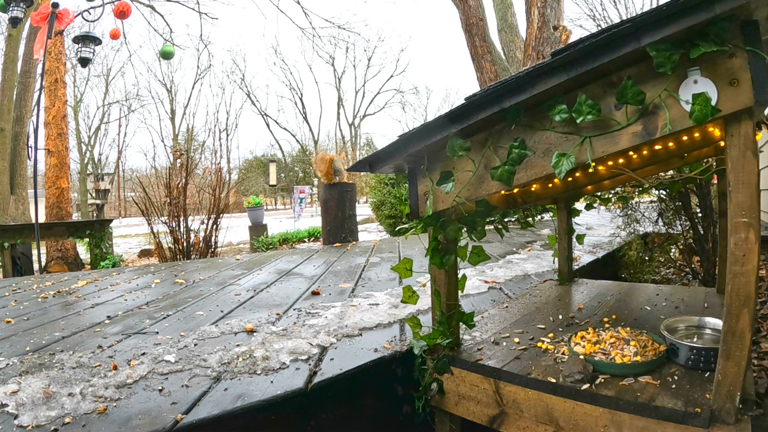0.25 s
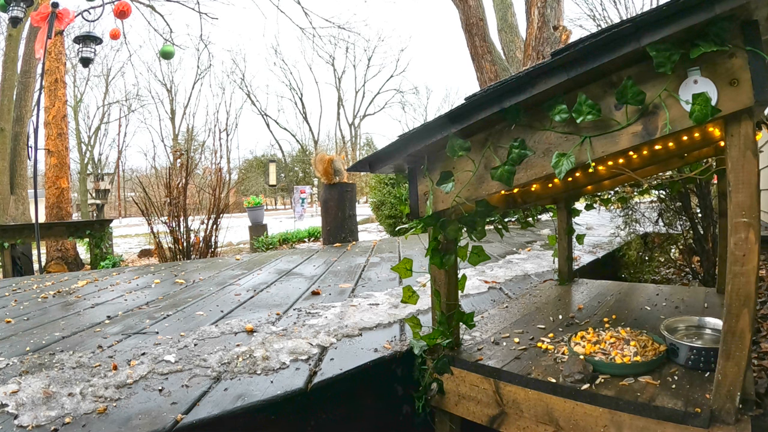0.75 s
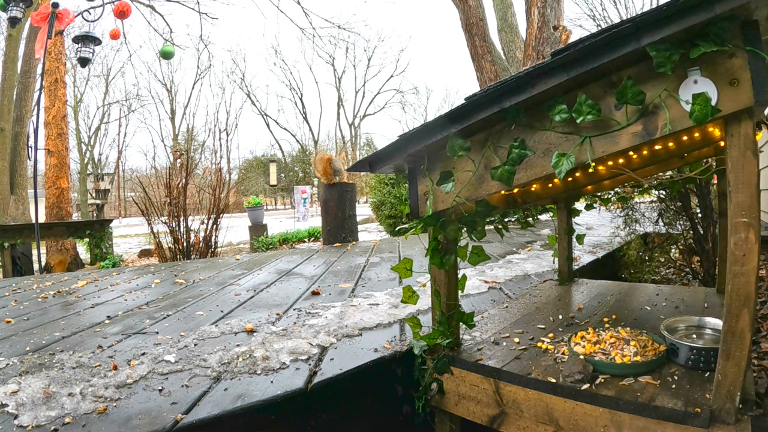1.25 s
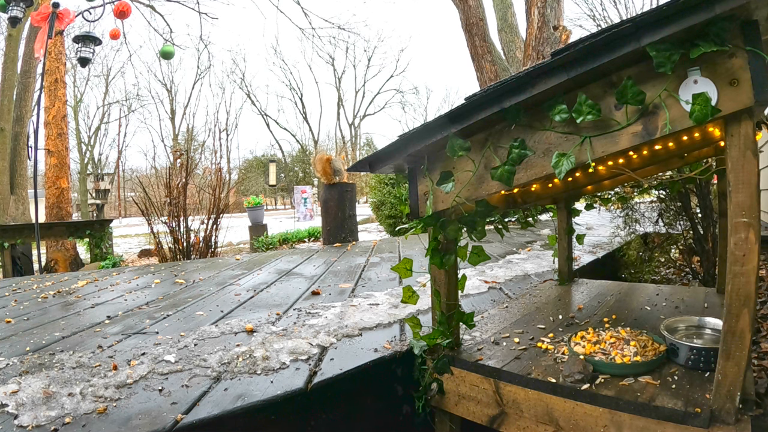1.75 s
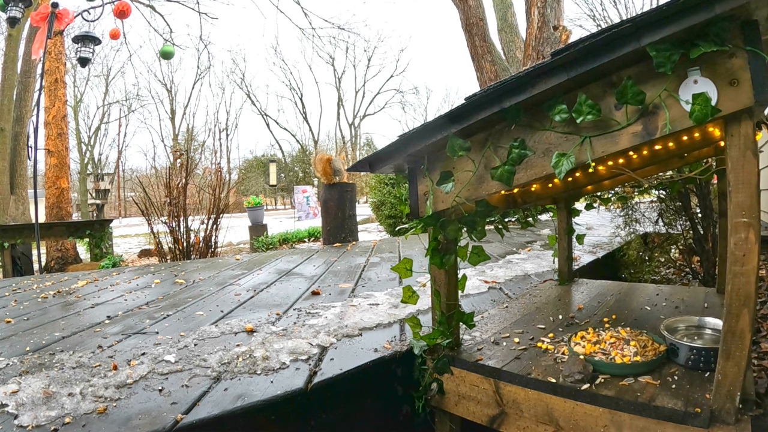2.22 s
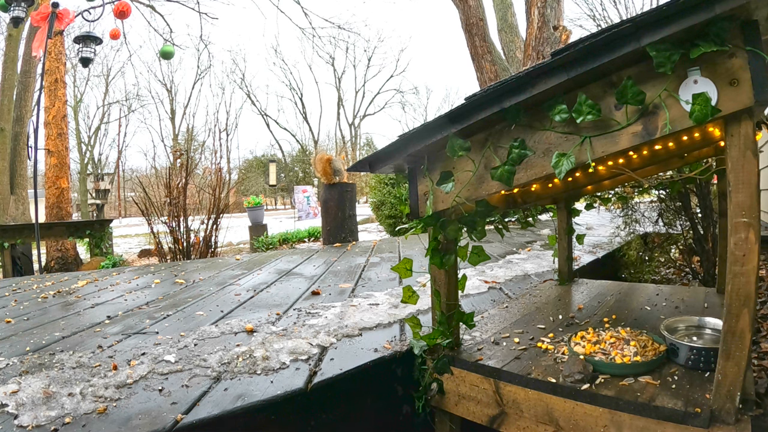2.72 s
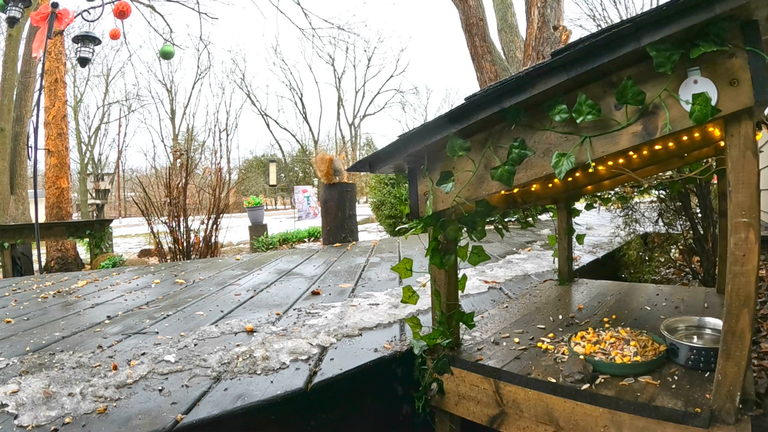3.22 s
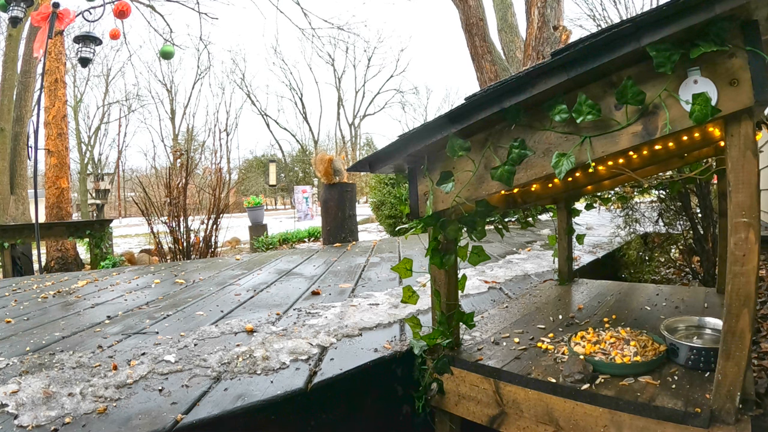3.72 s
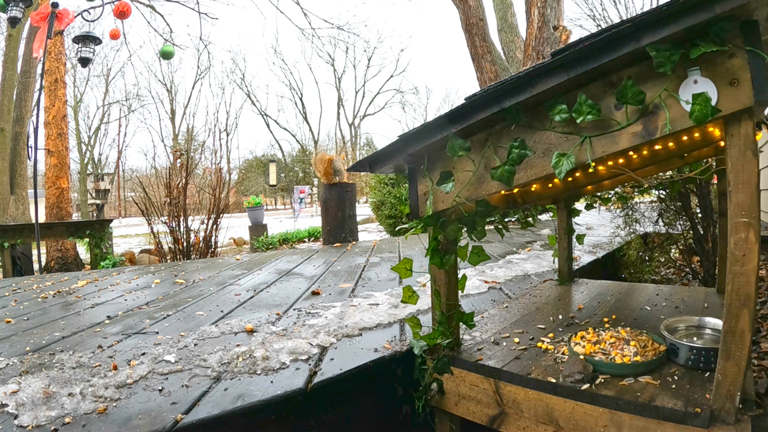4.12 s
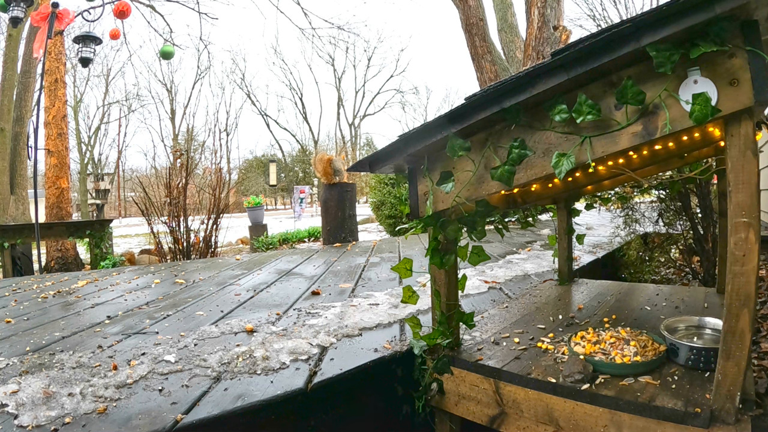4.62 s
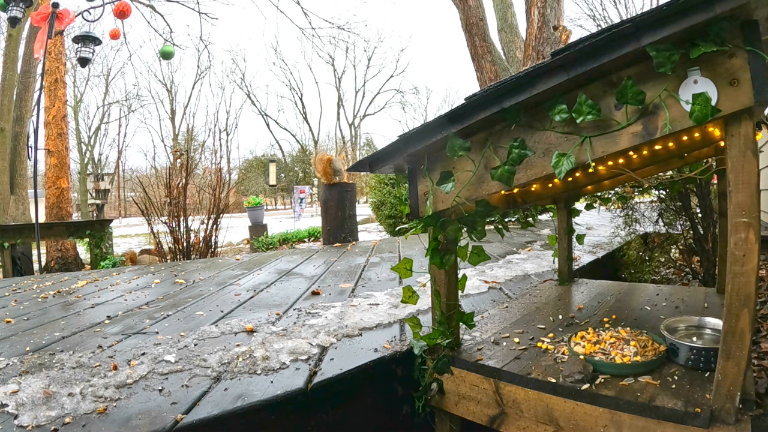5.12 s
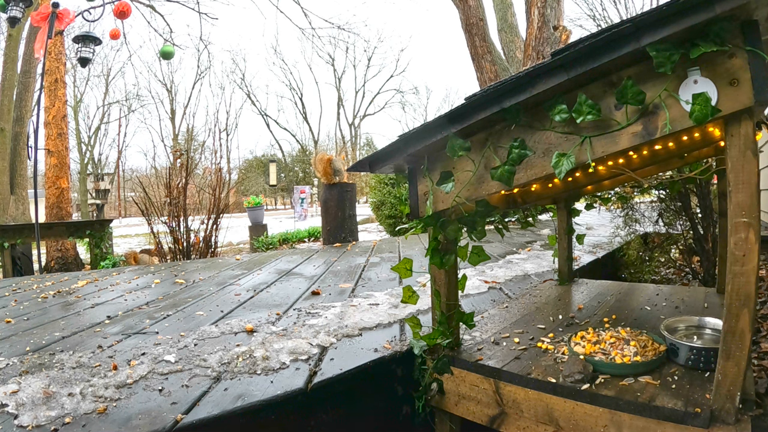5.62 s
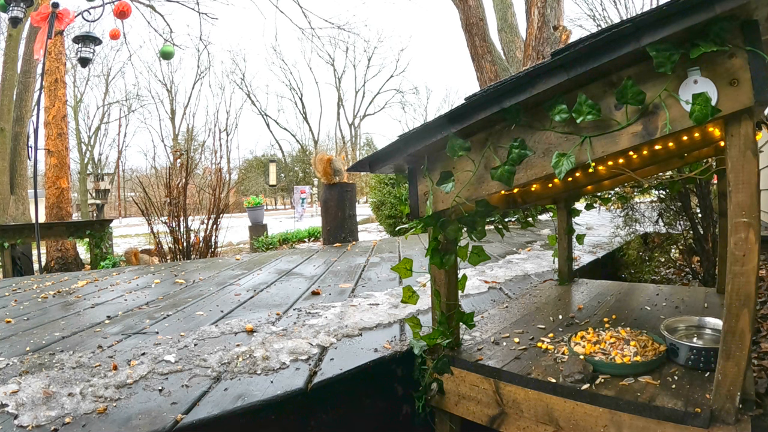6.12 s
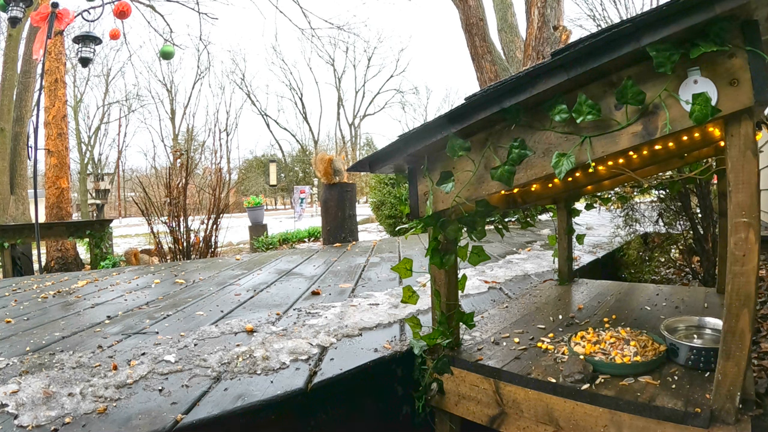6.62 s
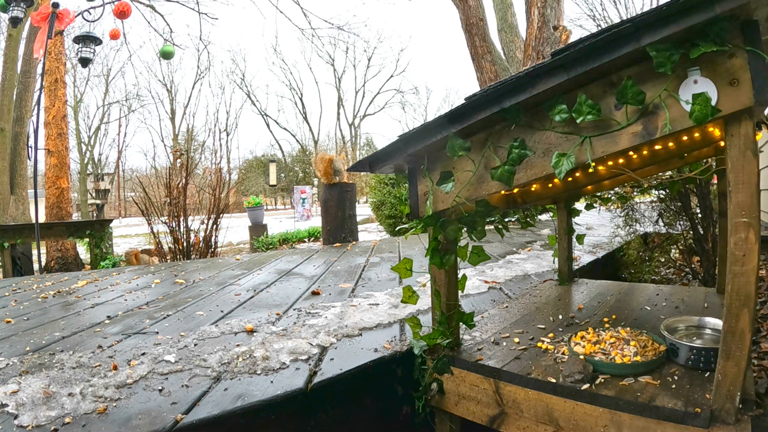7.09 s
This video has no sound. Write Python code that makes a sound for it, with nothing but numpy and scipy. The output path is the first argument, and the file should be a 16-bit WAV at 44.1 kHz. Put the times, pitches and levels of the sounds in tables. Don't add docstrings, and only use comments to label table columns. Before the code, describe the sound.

A snowy yard with bare trees, heard in wide stereo by a microphone near a feeder. From 0 seconds small songbirds give quick, scratchy whistled chirps, each a few hundredths of a second, mostly 3 to 5 kHz, spread left, centre and right with short scattered echoes. Steady low traffic rumble lies beneath. The chirping thins around 0.5 to 1.2 seconds, with a faint long falling whistle near 1.0. Wind thumps the microphone from 0.7 to 2.7, strongest around 1.0, 1.5, 1.75 and 2.5, mostly on the right. From 2 seconds the chatter grows denser, backed by farther birds and thin, high raspy calls. Another low gust hits at 3.85. Bright loud chirps stand out near 3.6, 4.6 and 5.6. Tiny husk ticks fall at 2.0, 2.9 and 5.9. Two soft nasal calls come at 6.2 and 6.5, slightly left; twittering continues to the end near 7.3.

```python
import sys
import numpy as np
from scipy import signal
from scipy.fft import rfft, irfft
from scipy.io import wavfile
from scipy.ndimage import uniform_filter1d

SR = 44100
rng = np.random.default_rng(int(sys.argv[2]) if len(sys.argv) > 2 else 0)


def waveform_to_disk(signal):
    frames = np.transpose(np.atleast_2d(signal))
    scaled = np.clip(frames, -1, 1) * 32767
    samples = np.round(scaled).astype(np.int16)
    wavfile.write(sys.argv[1], SR, samples)


def rack_gain(trim_db):
    fader = np.asarray(trim_db, float)
    return 10 ** (fader / 20)


N = 324135
TIME = np.arange(N) / SR


def band(x, lo_hz, hi_hz):
    sos = signal.butter(2, [lo_hz, hi_hz], "bandpass", fs=SR, output="sos")
    y = signal.sosfilt(sos, x)
    return y / y.std()


def curve(table, column):
    return np.interp(TIME, np.transpose(table)[0], np.transpose(table)[column])


def pair(like):
    mid, side = rng.standard_normal((2, N))
    like = np.clip(like, 0, 1)
    opposite = np.array([[1], [-1]])
    return np.sqrt((1 + like) / 2) * mid + np.sqrt((1 - like) / 2) * side * opposite


def whistles(notes, pan_db, lag, edge_s, waver, flutter_db, overtone_db):
    out = np.zeros((2, N + 99))
    edge = int(edge_s * SR)
    wobble = 1 + waver * band(rng.standard_normal(N), 39.7, 180)
    breath = rack_gain(flutter_db * np.tanh(band(rng.standard_normal(N), 39.5, 282)))
    second, third = rack_gain(overtone_db)
    for (s, ms, start, middle, end, db), pan, late in zip(notes, pan_db, lag):
        size = int(ms * SR / 1000)
        i = np.arange(max(int(s * SR) - edge, 0), min(int(s * SR) + size + edge, N))
        z = (i - s * SR) / size
        slope = 4 * middle - 3 * start - end
        bend = 2 * (start + end - 2 * middle)
        hz = wobble[i] * (start + z * slope + z * z * bend)
        phase = 2 * np.pi * np.cumsum(hz) / SR
        ramp = np.clip(np.minimum(i - i[0], i[-1] - i) / (2 * edge), 0, 1)
        tone = np.sin(phase) + second * np.sin(2 * phase) + third * np.sin(3 * phase)
        tone = tone * breath[i] * np.sin(ramp * np.pi / 2) ** 2
        out[0, i + max(late, 0)] += tone * rack_gain(db + pan / 2)
        out[1, i + max(-late, 0)] += tone * rack_gain(db - pan / 2)
    return out[:, :N]


# start and end against middle pitch [%] for a note of SHAPE_MS, growth with length [power]
RISE, FALL, ARCH = (-17, 9.2, 0.29), (9.8, -11.5, 0.38), (-9, -13, 0.63)
DIP, HOOK, HOLD = (8.9, 13, 0.444), (-7, 20.7, 0.434), (1.17, -3, 0.73)
SHAPE_MS = 30
SCOOP_OVER_MS, SCOOP_MS, SCOOP_FROM, SCOOP_DB = 33, 12, 0.72, -11


def shaped(*tables):
    notes = []
    for table, shape in tables:
        a, b, grow = shape
        for s, ms, hz, db in table:
            depth = (ms / SHAPE_MS) ** grow / 100
            start = hz * (1 + a * depth)
            notes.append((s, ms, start, hz, hz * (1 + b * depth), db))
            if shape in (ARCH, FALL) and ms > SCOOP_OVER_MS:
                low = SCOOP_FROM * start
                notes.append((s - SCOOP_MS / 1000, SCOOP_MS, low, (low + start) / 2, start, db + SCOOP_DB))
    return notes


# level, left minus right [level/dB]
PERCH_DB = [3.2, 0.3, 4.8]
PERCH_LAG = [-33, 2, 8]
# onset [t/s], length [t/ms],
# middle pitch [f/Hz], level [level/dB]
LEFT_RISES = [(.33, 18, 3550, -42.5), (7.01, 38, 5090, -46.5), (.373, 31, 3620, -45.5),
              (1.387, 18, 4110, -38.5), (2.389, 18, 4140, -41.5), (2.475, 52, 3950, -42),
              (2.583, 31, 3510, -42), (4.399, 22, 4300, -37.5), (4.761, 17, 4200, -34)]
LEFT_FALLS = [(.397, 29, 3030, -50.5), (1.414, 28, 4210, -40.5), (1.479, 51, 4260, -38.5),
              (1.914, 68, 3810, -42.5), (2.41, 35, 4570, -39), (2.532, 64, 3500, -45.5),
              (2.614, 35, 3350, -38.5), (3.216, 39, 4110, -37), (3.396, 26, 4540, -37.5),
              (3.546, 14, 4090, -33.5), (3.743, 43, 4210, -41.5), (3.833, 62, 4270, -45),
              (4.144, 16.5, 4300, -36.5), (4.43, 20, 3800, -35.5), (5.311, 11, 2960, -40.5),
              (5.992, 28, 4630, -43)]
LEFT_ARCHES = [(.035, 84, 3940, -42.5), (.135, 56, 3230, -47), (3.256, 27, 3820, -40.5),
               (3.985, 62, 3580, -45), (4.552, 26.5, 4420, -32), (5.187, 19, 4720, -34),
               (5.35, 16, 7600, -67), (5.732, 58, 6180, -46.5), (6.031, 32, 3890, -41.5),
               (6.138, 42, 3490, -37), (6.244, 37, 3320, -42.5), (6.461, 14.6, 4080, -35),
               (6.715, 39, 4350, -37), (6.822, 38, 3340, -43), (7.04, 95, 3770, -40.5)]
LEFT_DIPS = [(2.511, 22, 3400, -45.5), (3.604, 35.5, 3225, -28.5), (3.631, 68, 3300, -43),
             (3.792, 36, 3280, -37), (4.133, 30, 4170, -38), (4.428, 27, 5400, -41),
             (5.575, 17.2, 3250, -30), (5.593, 42, 3450, -37.5), (5.629, 33, 3200, -37),
             (6.01, 19, 3970, -39)]
MIDDLE_RISES = [(.355, 28, 2790, -45.5), (2.451, 23, 4030, -39.5), (2.64, 16, 3930, -41),
                (4.204, 27.4, 3465, -42.5), (5.829, 35, 4930, -45)]
MIDDLE_FALLS = [(2.86, 12, 3250, -39), (.942, 6.2, 3020, -49), (1.349, 32, 3116, -43.5),
                (1.908, 28, 3620, -39), (3.58, 22, 4140, -33.5), (3.815, 28.4, 2540, -45),
                (3.83, 20, 3380, -45), (3.916, 53, 4450, -43), (4.854, 39, 3530, -42.5),
                (5.206, 54, 4560, -48), (5.496, 45, 4650, -39), (6.066, 33, 3140, -42),
                (6.584, 46, 4050, -42.5), (6.797, 57, 3840, -40.5)]
MIDDLE_ARCHES = [(0.818, 25, 4830, -49), (1.53, 65, 3530, -41.5), (2.126, 33, 3490, -40),
                 (2.165, 33, 3120, -39), (2.215, 27, 5650, -51), (3.428, 44, 3340, -44.5),
                 (3.564, 15.6, 5100, -34.5), (5.122, 42, 3190, -43.5), (6.62, 75, 3990, -45.5)]
MIDDLE_DIPS = [(.85, 42, 2610, -50), (1.32, 33, 3130, -43), (5.168, 22, 3930, -36.5),
               (5.273, 27, 3170, -47), (5.537, 31, 3080, -42), (5.764, 11, 5820, -50)]
MIDDLE_HOOKS = [(.89, 52, 3150, -44), (1.455, 30, 3450, -46), (1.94, 76, 3450, -41), (2.817, 40, 3250, -38),
                (4.084, 50, 3500, -45), (4.815, 42, 3400, -41), (7.245, 28, 3300, -37.5),
                (2.97, 45, 3250, -45), (4.68, 25, 3300, -46), (4.515, 40, 5500, -47), (.225, 42, 4600, -48)]
RIGHT_RISES = [(1.217, 29, 4930, -42.5), (1.88, 27, 4990, -43.5), (2.685, 18, 5430, -40.5),
               (3.378, 12.6, 4700, -39), (3.724, 18, 4330, -37), (4.044, 41, 4980, -48.5),
               (4.983, 21, 4670, -38), (5.372, 23.5, 4380, -46), (5.51, 37, 5430, -46),
               (5.53, 39, 4360, -37.5), (6.364, 9.8, 4720, -37.5), (6.515, 24, 4560, -36),
               (6.553, 35, 4550, -40.5)]
RIGHT_FALLS = [(.062, 22, 4880, -41.5), (1.238, 41, 4440, -47), (2.046, 30, 3350, -43),
               (2.234, 16, 4650, -41.5), (3.312, 64, 3840, -44), (3.355, 27, 3550, -48),
               (4.174, 20, 3570, -34), (4.203, 40, 5080, -43.5), (4.577, 60, 3690, -33.5),
               (5.133, 14, 4890, -36.5), (5.393, 27, 3600, -41.5), (5.559, 14.4, 4106, -38),
               (5.875, 5.5, 2970, -43), (6.115, 8.4, 3730, -35), (6.202, 51, 3380, -41),
               (6.379, 41, 4670, -36), (6.533, 27, 4180, -43)]
RIGHT_ARCHES = [(5.95, 43, 5450, -52), (1.893, 35, 4270, -40), (2.016, 23, 4360, -36.5),
                (2.263, 22, 4950, -41), (2.295, 22, 4470, -41), (2.985, 36, 4830, -34.5),
                (3.282, 45, 4720, -37.5), (3.95, 12, 3900, -40), (4.238, 82, 5240, -48),
                (5.86, 5.3, 3650, -34.5), (6.09, 26, 4490, -37.5), (7.184, 14, 4950, -39.5)]
RIGHT_DIPS = [(1.974, 56.3, 2846, -42), (2.66, 25.7, 7180, -48.5)]
RIGHT_HOLDS = [(2.705, 77, 5800, -44.5), (3.7, 44, 4940, -49), (3.968, 8.9, 3150, -44),
               (4.342, 29, 4550, -40), (4.621, 52, 3223, -33), (4.778, 38, 4860, -43),
               (5.003, 46, 4900, -45), (5.105, 25, 5060, -41), (7.2, 55, 3044, -40)]
# onset [t/s], length [t/ms], start [f/Hz], end [f/Hz], level [level/dB]
SWOOP = (.975, 150, 5350, 1850, -46.5)
SWOOP_SAG_HZ = 300


def flock():
    left = shaped((LEFT_RISES, RISE), (LEFT_FALLS, FALL), (LEFT_ARCHES, ARCH), (LEFT_DIPS, DIP))
    middle = shaped((MIDDLE_RISES, RISE), (MIDDLE_FALLS, FALL), (MIDDLE_ARCHES, ARCH),
                    (MIDDLE_DIPS, DIP), (MIDDLE_HOOKS, HOOK))
    right = shaped((RIGHT_RISES, RISE), (RIGHT_FALLS, FALL), (RIGHT_ARCHES, ARCH),
                   (RIGHT_DIPS, DIP), (RIGHT_HOLDS, HOLD))
    s, ms, a, b, db = SWOOP
    right.append((s, ms, a, (a + b) / 2 + SWOOP_SAG_HZ, b, db))
    sizes = [len(left), len(middle), len(right)]
    pan_db, lag = np.repeat(PERCH_DB, sizes), np.repeat(PERCH_LAG, sizes)
    return rack_gain(2.5) * whistles(left + middle + right, pan_db, lag, edge_s=.0045, waver=.008,
                               flutter_db=5.5, overtone_db=[-31, -44])


# level, left minus right [level/dB]
STROKE_PAN_DB = [7, 2.5, 1]
# onset [t/s], length [t/ms], start [f/Hz], end [f/Hz], level [level/dB]
LEFT_STROKES = [(0.31, 18, 3510, 3210, -43), (6.385, 31, 2350, 1980, -55), (2.291, 7.6, 3840, 3700, -38),
                (2.477, 8.9, 3650, 3670, -42), (2.568, 11, 3340, 3300, -42), (2.581, 12, 3250, 3440, -48),
                (2.772, 12, 3800, 3770, -40), (2.794, 11, 3440, 3350, -37), (2.921, 22, 4110, 3960, -37),
                (3.204, 29, 4370, 4540, -44.5), (3.258, 28, 3200, 3190, -46), (3.308, 15, 3980, 3900, -50),
                (3.961, 20, 3070, 3190, -46), (4.263, 25, 4720, 4480, -49), (4.317, 22, 3820, 3730, -48),
                (4.483, 26, 3680, 3570, -39.5), (4.688, 10, 3750, 3830, -46),
                (4.733, 16, 3950, 3640, -44.5), (4.771, 30, 4970, 4750, -42.5), (4.8, 14, 4030, 4220, -41),
                (4.868, 6.3, 3070, 2900, -40), (4.992, 13, 4700, 4400, -49), (5.0, 27, 4230, 4250, -46.5),
                (5.211, 13, 3610, 3830, -46), (5.381, 13, 4140, 4240, -47.5), (5.568, 23, 3800, 3740, -41),
                (5.052, 14, 2000, 2270, -54), (6.101, 9, 4800, 4840, -44), (6.11, 16, 3700, 3740, -39),
                (6.127, 17, 3350, 3370, -43), (6.296, 24, 2535, 2420, -50.5), (6.321, 23, 5660, 5780, -47),
                (6.552, 20, 4850, 4880, -51), (6.659, 16, 3050, 3150, -44.5), (6.789, 15, 2750, 3120, -45),
                (7.031, 18, 2390, 3140, -57), (7.106, 9.3, 3350, 3350, -42), (7.19, 47, 2300, 2570, -53)]
FRONT_STROKES = [(0.097, 21, 3220, 3250, -44), (0.143, 17, 3074, 3280, -40.5),
                 (0.164, 9.6, 2750, 2600, -44), (1.41, 16, 4520, 4420, -41.5),
                 (1.567, 23, 3020, 2870, -48.5), (2.282, 18, 3490, 3250, -44),
                 (2.319, 15, 3250, 3460, -46.5), (2.617, 13.6, 2970, 2710, -43.5),
                 (3.024, 29, 4960, 5030, -46), (3.048, 39, 4200, 4100, -43.5), (3.205, 23, 5010, 5150, -51),
                 (3.322, 14, 4800, 4700, -49), (3.329, 25, 3740, 3630, -48), (3.488, 40, 3550, 3770, -46),
                 (3.583, 11, 3330, 3410, -42), (.002, 30, 2610, 2940, -50.5), (0.216, 46, 6320, 7040, -58),
                 (2.5, 21, 2180, 2640, -52), (3.787, 7.4, 4080, 3870, -42),
                 (3.857, 11.5, 4250, 4350, -41.5), (4.164, 24, 3240, 3500, -44),
                 (4.228, 9.9, 4320, 4220, -43), (4.236, 18, 5310, 5550, -42), (4.525, 27, 4870, 4760, -43),
                 (4.651, 15, 3760, 3860, -45), (4.443, 17, 3450, 2390, -57), (5.248, 25, 3700, 3990, -46.5),
                 (5.554, 33, 5730, 5370, -49), (5.11, 25, 2214, 2920, -51), (5.632, 21, 3290, 3150, -39),
                 (6.352, 26, 4000, 4080, -46.5), (6.749, 13, 3540, 2940, -43),
                 (6.768, 9.3, 3340, 3300, -37.5), (6.782, 17, 4490, 4850, -44.5),
                 (6.794, 25, 3540, 3320, -41), (6.846, 6.9, 3460, 3250, -34),
                 (7.054, 8.4, 3070, 3280, -40.5)]
STEEP_STROKES = [(0.807, 15, 2740, 4730, -48.5), (.78, 41, 4000, 5500, -55.5), (1.288, 19, 2320, 3850, -49),
                 (1.213, 17, 3560, 5070, -53), (2.203, 15, 3230, 5700, -47.5), (2.245, 20, 4500, 3030, -52),
                 (2.257, 8.1, 2800, 4880, -55), (2.287, 11, 2760, 4130, -41), (2.1, 26, 4200, 4400, -49.5),
                 (2.733, 12, 2660, 4450, -49), (2.744, 23.5, 4320, 4150, -38), (2.772, 17, 4030, 2690, -52),
                 (2.794, 28, 5270, 6000, -50), (2.877, 12, 2750, 4340, -57), (2.889, 29, 4445, 4150, -42.5),
                 (2.938, 13, 3900, 2980, -43), (3.075, 27, 3070, 3720, -43), (4.173, 8.8, 4360, 5900, -43),
                 (4.185, 31, 5930, 5650, -57), (4.413, 14, 4600, 6000, -43), (4.425, 28, 5830, 5500, -49),
                 (4.461, 29, 2570, 3700, -48.5), (4.52, 44, 2700, 4300, -48),
                 (5.059, 29, 2540, 3990, -46.5), (5.09, 21, 3900, 2980, -41.5), (7.23, 23, 4130, 5540, -49),
                 (7.259, 15, 2675, 4280, -42), (7.271, 55, 4280, 3680, -43), (0.267, 12, 3200, 4200, -40.5),
                 (0.284, 45, 4250, 3830, -46), (1.716, 70, 2410, 4650, -62), (1.799, 39, 4570, 3060, -60),
                 (5.437, 24, 2380, 3480, -51), (5.451, 22, 3800, 2470, -46), (.895, 33, 5250, 6170, -57.5)]


def strokes():
    tables = [LEFT_STROKES, FRONT_STROKES, STEEP_STROKES]
    notes = [(s, ms, a, (a + b) / 2, b, db) for table in tables for s, ms, a, b, db in table]
    pan_db = np.repeat(STROKE_PAN_DB, [len(table) for table in tables])
    return whistles(notes, pan_db, np.zeros(len(notes), int), edge_s=.004, waver=.008,
                    flutter_db=5.0, overtone_db=[-31, -44])


def crowd(count, lo_hz, hi_hz, arch, lean_db):
    u = rng.random((count, 8)).T
    hz = lo_hz + (hi_hz - lo_hz) * u[2] ** 1.2
    db = 6 * u[5] - 9 * u[2]
    start, end = hz * (1 - arch * u[3]), hz * (1 - arch * u[4])
    notes = list(zip(u[0] * TIME[-1], 11 + 26 * u[1], start, hz, end, db))
    pan_db = lean_db + 9 * (u[6] - .5)
    lag = (50 * (u[7] - .5)).astype(int)
    out = whistles(notes, pan_db, lag, edge_s=0.0048, waver=0.008, flutter_db=2.1, overtone_db=[-30, -40])
    return out / out.std()


# onset [t/s], length [t/ms], level [level/dB]
RASPS = [(0.0, 65, -44), (0.22, 44, -56), (0.79, 52, -50.5), (1.192, 44, -45), (1.347, 77, -55),
         (1.841, 100, -52.5), (2.095, 83, -54.5), (2.365, 34, -51), (2.494, 40, -51.5), (2.654, 320, -57.5),
         (3.042, 16, -41.5), (3.248, 37, -39.5), (3.569, 52, -41.5), (4.131, 150, -56), (4.36, 110, -52.5),
         (4.531, 45, -42.5), (4.729, 37, -54), (4.929, 260, -52.5), (5.338, 49, -48.5), (5.478, 56, -46.5),
         (5.712, 48, -41.5), (5.782, 130, -56), (6.296, 62, -47.5), (6.48, 105, -46), (7.079, 72, -55),
         (7.139, 55, -47),
         (3.95, 67, -48.5),
    (6.72, 43.7, -50),
]


def far_flock(near):
    power = np.mean(near ** 2, axis=0)
    swell = uniform_filter1d(uniform_filter1d(power, int(.06 * SR)), int(0.082 * SR))
    swell = np.clip(swell, 0, None) ** 0.51 + rack_gain(-82)
    chatter = crowd(count=1000, lo_hz=2980, hi_hz=6087, arch=0.3, lean_db=2.0) * swell * rack_gain(-7.0)
    burst = swell * rack_gain(-19.0)
    for s, ms, db in RASPS:
        z = (TIME - s) * 1000 / ms
        burst += rack_gain(db) * (1 + np.tanh(4 * z)) * (1 - np.tanh(0.97 * (z - 1)))
    thin = crowd(count=400, lo_hz=6170, hi_hz=8130, arch=0.15, lean_db=1.5)
    thinnest = crowd(count=300, lo_hz=9450, hi_hz=13000, arch=0.2, lean_db=4.5)
    rasp_db = -12 + 3 * band(rng.standard_normal(N), 15, 90)
    hiss = band(pair(.5), 6000, 12500) * rack_gain(rasp_db)
    return chatter + (thin + rack_gain(-9) * thinnest + hiss) * burst * rack_gain(-16.0)


def yard(x, t60_s, wet_db):
    t = np.arange(SR // 2) / SR
    sparse = rng.standard_normal((2, len(t))) ** 3
    echo = sparse * rack_gain(-60 * t / t60_s) * (t > .003)
    echo = echo / np.sqrt(np.sum(echo ** 2, axis=1, keepdims=True))
    return x + rack_gain(wet_db) * signal.fftconvolve(x, echo, axes=1)[:, :N]


# frequency [f/Hz], spectral density [level/dB per Hz]
TOWN = [(72, 0.5), (170, -17), (421, -36), (940, -20.5), (2220, -32.5), (4600, -44.5), (8000, -55.5),
        (15000, -70)]


def town():
    hz, db = np.transpose(TOWN)
    f = np.fft.rfftfreq(N, 1 / SR) + 1
    noise = np.where(f < 300, rfft(pair(1.0)), rfft(pair(0.58)))
    lean_db = np.interp(f, [300, 600], [0.2, 1.6]) * np.array([[1], [-1]])
    out = irfft(noise * rack_gain(np.interp(np.log(f), np.log(hz), db) + lean_db), N)
    return rack_gain(-38.5) * out / out.std()


# time [t/s], level [level/dB]
WIND = [
    (0.0, -38),
    (1.82, -27.5),
    (3.0, -38.5),
    (3.7, -38.5),
    (3.85, -26.5),
    (3.93, -36),
    (4.75, -36),
    (7.35, -35.5),
]
# onset [t/s], peak [level/dB]
BUFFETS = [(0.71, -21.5), (0.779, -28.5), (0.854, -20), (0.972, -11), (1.038, -24), (1.155, -19),
           (1.33, -31.5), (1.489, -9.5), (1.556, -24.5), (1.636, -24), (1.748, -11), (1.851, -17),
           (1.899, -18), (2.04, -18), (2.123, -20.5), (2.229, -30), (2.521, -10.5), (2.682, -21.5),
           (3.836, -16.5)]
PORT_RING_HZ, PORT_RING_DB = 156.2, -11.5


def wind():
    lumps = rack_gain(1.8 * band(rng.standard_normal(N), 14.4, 22.5))
    gust = band(pair(0.96), 23.5, 74.8) * lumps * rack_gain(curve(WIND, 1) - 2.0)
    push, ring = np.zeros(N), np.zeros(N)
    for s, db in BUFFETS:
        age = np.clip(TIME - s, 0, None) / 0.0085
        pulse = rack_gain(db) * age * np.exp(1 - age)
        push += pulse
        ring += pulse * np.sin(2 * np.pi * PORT_RING_HZ * (TIME - s))
    thump = band(band(pair(0.72), 62, 189), 25, 233) * push * rack_gain(-5.0)
    flap = band(pair(0.2), 145, 313) * push * rack_gain(-23)
    buffet = thump + flap + rack_gain(PORT_RING_DB) * ring
    return gust * rack_gain(np.array([[-2.2], [2.2]])) + buffet * rack_gain(np.array([[-9.0], [-2.5]]))


# onset [t/s], peak [level/dB]
TICKS = [
    (2.041, -40),
    (2.949, -44),
    (5.8757, -36),
]


def ticks():
    out = np.zeros(N)
    for s, db in TICKS:
        out += rack_gain(db) * (TIME > s) * np.exp(-np.clip(TIME - s, 0, 1) / 0.0052)
    return out * band(pair(0.9), 2400, 6800)


# onset [t/s], length [t/s], start [f/Hz], end [f/Hz], level [level/dB]
NASAL = [
    (6.235, .175, 846, 815, -52),
    (6.49, .2, 830, 800, -54),
]
NASAL_DB = [-3, 2, 2, -6, -7, 0, -4, -12]


def nasal():
    out = np.zeros(N)
    for s, length, a, b, db in NASAL:
        z = np.arange(int(length * SR)) / (length * SR)
        rough = 1 + .003 * band(rng.standard_normal(len(z)), 30, 200)
        phase = 2 * np.pi * np.cumsum((a + (b - a) * z) * rough) / SR
        stack = sum(rack_gain(g) * np.sin((k + 2) * phase) for k, g in enumerate(NASAL_DB))
        breath = rack_gain(db + 1.8 * band(rng.standard_normal(len(z)), 7.5, 80))
        first = int(s * SR)
        out[first:first + len(z)] += breath * stack * np.sin(np.pi * z) ** 0.42
    return out * rack_gain(np.array([[2.1], [-2.1]]))


def scene():
    near = flock() + rack_gain(5.0) * strokes()
    close = yard(near + nasal() + ticks(), t60_s=.17, wet_db=-8)
    far = yard(far_flock(near), t60_s=0.23, wet_db=-1.6)
    return close + far + town() + wind()


def band_limit(x):
    return signal.sosfilt(signal.butter(12, 15590, fs=SR, output="sos"), x)


def record(dry):
    right = signal.sosfilt(signal.butter(3, 9000, fs=SR, output="sos"), dry[1])
    both = signal.sosfilt(signal.butter(8, 14600, fs=SR, output="sos"), [dry[0], right])
    return band_limit(both)


dry = scene()
out = record(dry)
waveform_to_disk(out)
```